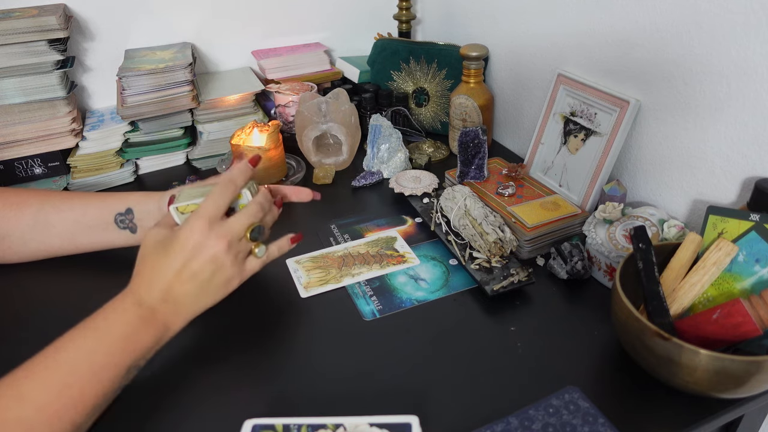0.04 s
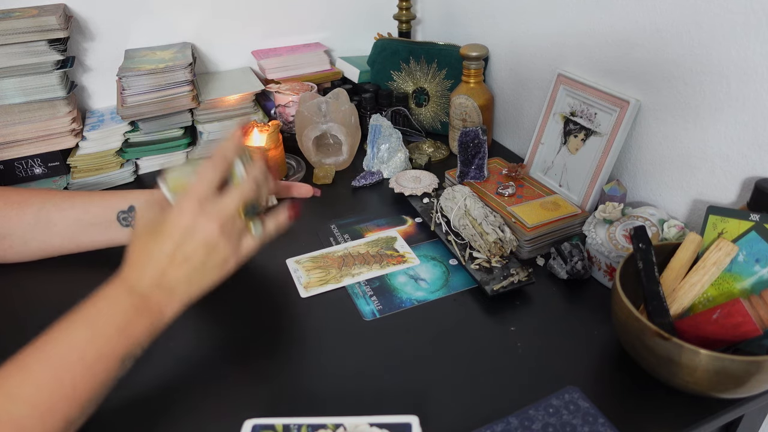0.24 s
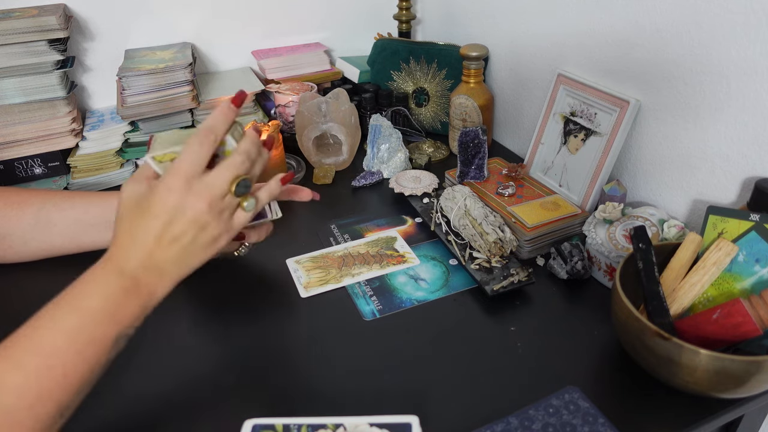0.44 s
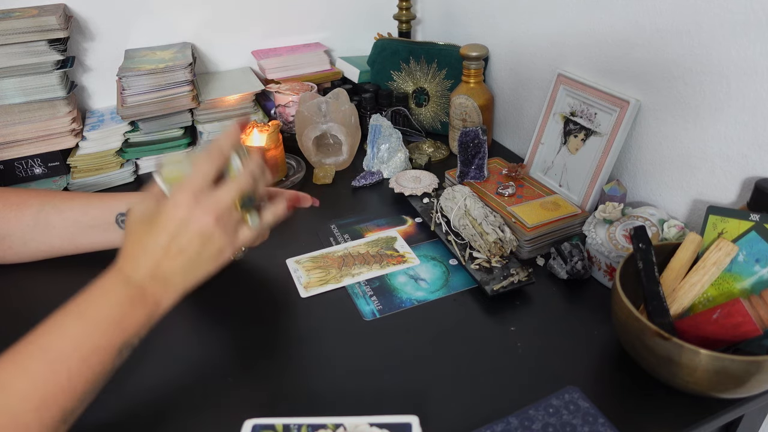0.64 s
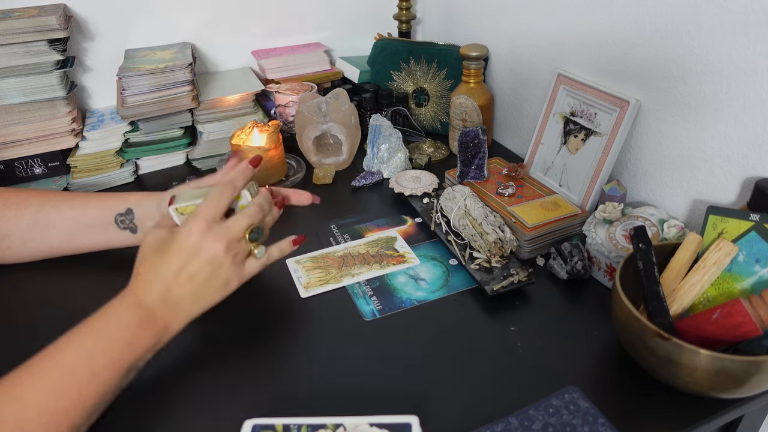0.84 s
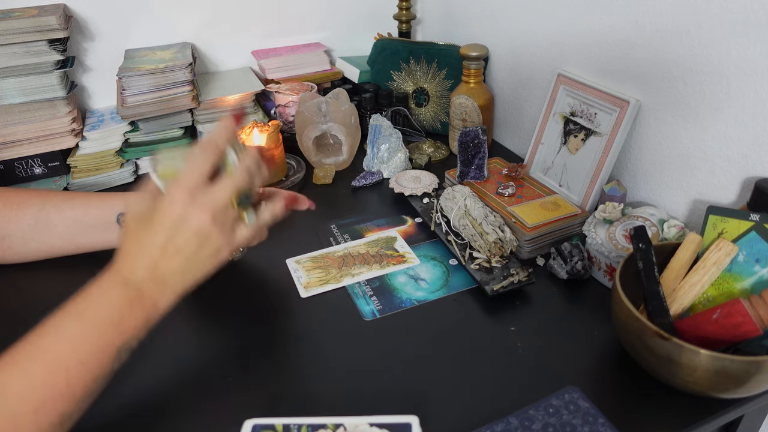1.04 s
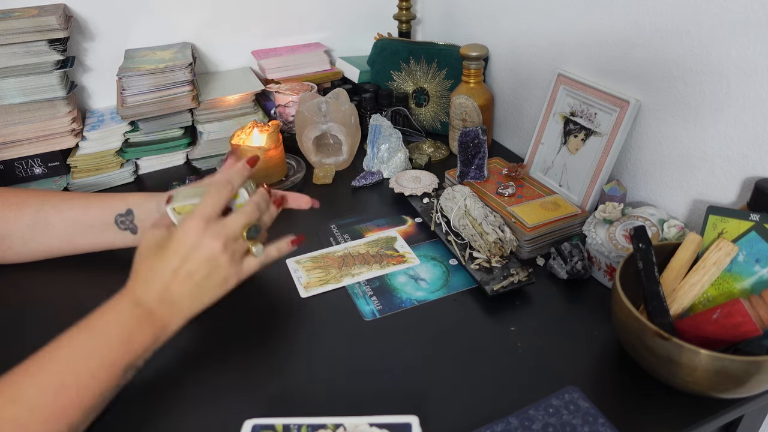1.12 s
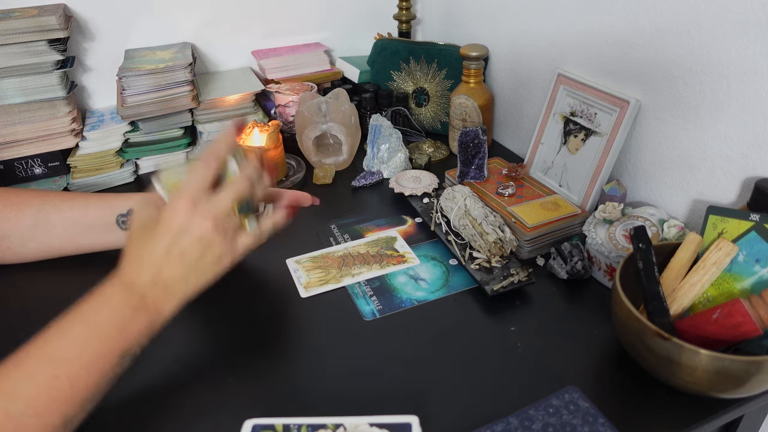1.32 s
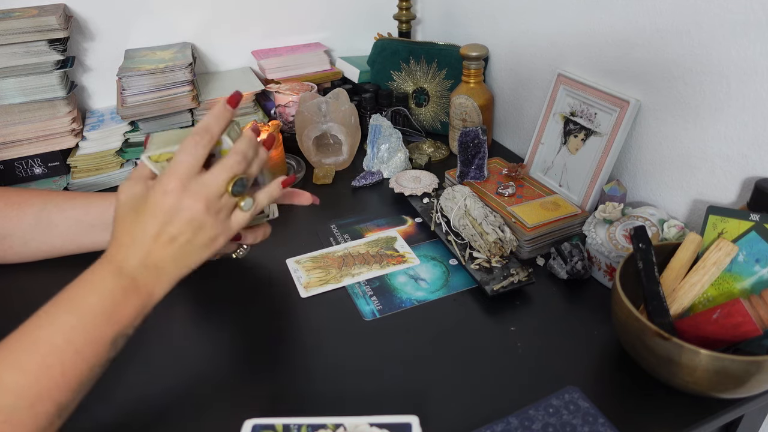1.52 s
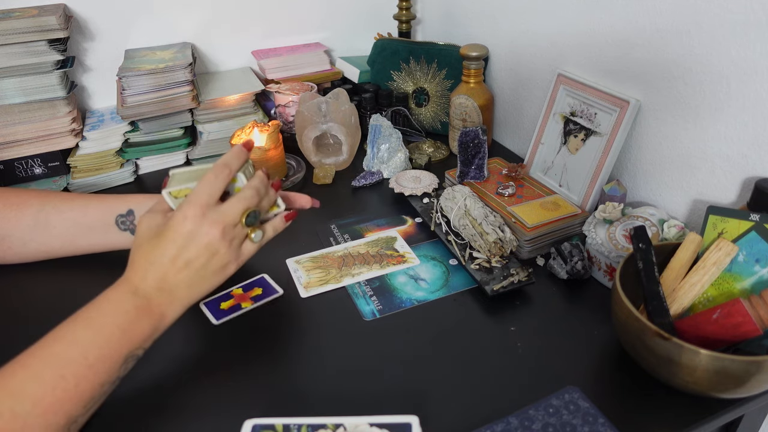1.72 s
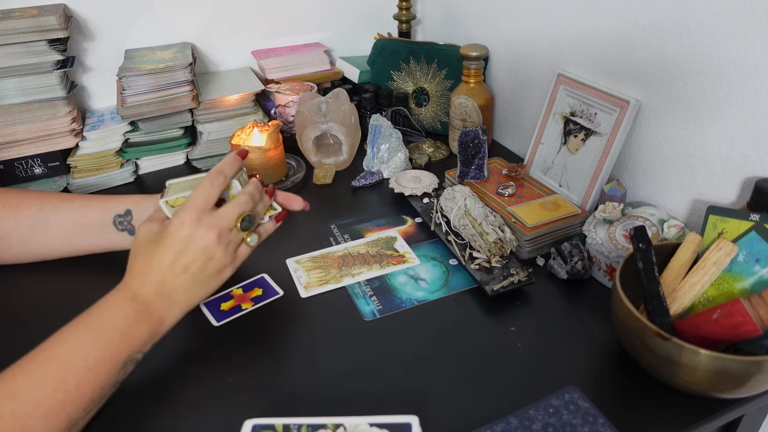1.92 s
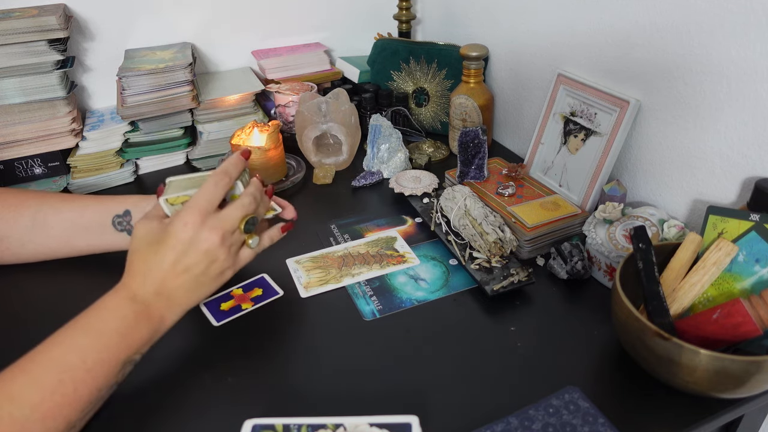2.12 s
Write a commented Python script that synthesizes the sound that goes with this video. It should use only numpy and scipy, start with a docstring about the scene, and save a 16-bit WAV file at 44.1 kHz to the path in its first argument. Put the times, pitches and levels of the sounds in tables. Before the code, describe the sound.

A deck of large cards is shuffled overhand in a small room: five brisk flick, slide and slap strokes, a rapid clatter of loose cards, then faint skidding and finger rubbing, picked up close.

```python
"""Overhand card shuffle

A deck of large cards is shuffled by hand above a table in a small room. In each stroke card edges flick,
a packet slides, then slaps onto the deck. The last packet clatters down, a card drops out and skids, and
fingers regrip the deck. Contacts are short noise bursts in five registers, rung through resonances;
slides are grainy filtered noise. Echoes, a diffuse tail and faint room tone surround them."""
import sys
import numpy as np
from scipy import signal
from scipy.fft import rfft, irfft
from scipy.io import wavfile

SR = 44100
rng = np.random.default_rng(int(sys.argv[2]) if len(sys.argv) > 2 else 0)


def transcribe(u):
    """Save the signal u as a 16-bit wav file named by the first command-line argument.

    u: samples, shape (n,) or (channels, n), limited to [-1, 1]; the rate is SR.
    q: integer samples, one column per channel.
    """
    v = np.clip(np.atleast_2d(u).T, -1, 1)
    q = np.round(v * 32767).astype(np.int16)
    wavfile.write(sys.argv[1], SR, q)


N = 95300  # length of the scene in samples
DIRECTIONS = 4  # paths of the sound: the first includes the direct one


def undb(db):
    """Decibels to gain."""
    return 10 ** (np.asarray(db) / 20)


def unit(x):
    """Scale to rms 1."""
    return x / np.sqrt(np.mean(x ** 2) + 1e-20)


def freqs(size):
    """Frequencies in Hz of the bins of a spectrum, kept above zero for the logarithm."""
    return np.maximum(np.fft.rfftfreq(size, 1 / SR), 1)


def curve(points, hz):
    """Read (Hz, value) points on a log frequency axis."""
    p = np.array(points, float)
    return np.interp(np.log(hz), np.log(p[:, 0]), p[:, 1])


def colour(x, db):
    """Filter by a gain in dB for each bin."""
    return irfft(rfft(x) * undb(db), x.shape[-1])


def resonate(x, hz, q, db):
    """Lift one resonance out of a sound."""
    b, a = signal.iirpeak(hz, q, fs=SR)
    return x + (undb(db) - 1) * signal.lfilter(b, a, x)


def add(out, start, x):
    """Mix x in at a time in seconds."""
    i = max(int(start * SR), 0)
    part = out[..., i:i + x.shape[-1]]
    part += x[..., :part.shape[-1]]


# Borders in Hz of the five registers of a contact: thud, body, snap, edge, tick.
REGISTER_BORDERS = [170, 480, 1500, 5000, 9000, 15000]
# Duration of each register, as a share of the contact length.
REGISTER_LENGTHS = [2.2, 0.91, 2.04, 0.95, 1.1]
ATTACK_S, SETTLE_S, SETTLE_DB = 0.0001, 0.007, -13.5  # onset, then a quieter tail as the cards settle
LEVEL_WINDOW_S = 0.005  # each register carries the energy of its level held this long
# The grip changes with every contact, and with it these two resonances.
HOLLOW_DB, HOLLOW_Q, RING_DB, RING_Q = 5.5, 6, 9.5, 4.95
RING_SPREAD_OCT = 0.4  # a bent packet rings at other pitches toward the walls


def contacts(table, trim_db, thud_db=None):
    """Cards touch in a brief burst that rings packet and cupped hand, finely different per direction."""
    default_thud = [] if thud_db is None else [thud_db]
    rows = np.array([list(row) + default_thud for row in table])
    start, length_ms, hollow, ring, snap, body, edge, tick, thud = rows.T[:, :, None, None]
    t = np.arange(1024) / SR
    length = length_ms / 1000
    touches = rng.standard_normal((len(rows), len(REGISTER_LENGTHS), DIRECTIONS, len(t)))
    for k, share in enumerate(REGISTER_LENGTHS):
        press = np.exp(-(t / (length * share)) ** 3)
        settle = undb(SETTLE_DB) * np.exp(-t / SETTLE_S)
        touches[:, k] *= (press + settle) * (1 - np.exp(-t / ATTACK_S))

    rung = np.empty_like(touches)
    for i, (hollow_hz, ring_hz) in enumerate(zip(hollow.ravel(), ring.ravel())):
        cupped = resonate(touches[i], hollow_hz, HOLLOW_Q, HOLLOW_DB)
        for d in range(DIRECTIONS):
            shift_oct = RING_SPREAD_OCT * (d - DIRECTIONS / 2) if d else 0
            rung[i, :, d] = resonate(cupped[:, d], ring_hz * 2 ** shift_oct, RING_Q, RING_DB)

    sounds = 0
    for k, relative_db in enumerate([thud, body, 0, edge, tick]):
        order = 2 if k == 0 else 3
        sos = signal.butter(order, REGISTER_BORDERS[k:k + 2], "band", fs=SR, output="sos")
        x = signal.sosfilt(sos, rung[:, k])
        level = np.sqrt(LEVEL_WINDOW_S * SR / np.sum(x ** 2, axis=-1, keepdims=True))
        sounds = sounds + undb(trim_db + snap + relative_db) * x * level

    out = np.zeros((DIRECTIONS, N))
    for s, sound in zip(start.ravel(), sounds):
        add(out, s, sound)
    return out


# Packets landing, a touch and then the blow. Each row: start in seconds, length in ms, pitch of the
# hand's hollow in Hz, central ring of the packet in Hz, snap in dB before the trim, then in dB relative
# to the snap: body, edge, tick, palm thud.
PACKET_SLAPS = [(.2503, 1.3, 1210, 3730, -35, -2.5, -4, -27, -13),
                (.2544, 1.18, 1260, 3550, -25, -5.5, -10.5, -16, -23),
                (.5144, 2.6, 540, 5200, -46.5, 2.5, 9, -11.5, -13),
                (.5227, 2.4, 1300, 3290, -31, -3, -13, -14, -25.5),
                (.7905, 1.9, 810, 4140, -38, -8.5, 1, -18.5, -12.5),
                (.7948, 2.35, 780, 7400, -36, -11, 4.5, -1.5, -14.5),
                (1.0673, 3.5, 765, 4400, -35.5, -7.5, -1.5, -17, -21),
                (1.0715, 1.02, 602, 7760, -32, -2.5, 4, 0.5, -14.5),
                (1.3467, 4.8, 1255, 3340, -36, -5, -14.5, -8.5, -16),
                (1.3723, 0.79, 905, 4840, -41.5, -6, -9.5, -16.5, -28)]


def slaps():
    """Each packet lands on the deck as a short burst with its own hollow and ring."""
    return contacts(PACKET_SLAPS, trim_db=-0.72)


# Cards of the loose last packet, hitting one after another. Each row: start in seconds, length in ms,
# hollow in Hz, central ring in Hz, snap in dB before the trim, then in dB relative to the snap: body,
# edge, tick, palm thud.
LOOSE_CARDS = [(1.453, 3.4, 1370, 2230, -39.5, -5.5, -11, -11, -27),
               (1.4612, 2, 1410, 1700, -39.5, -0.5, -8, -21.5, -8),
               (1.4654, 1.9, 1170, 4760, -35.5, -0.5, -4, -10.5, -15.5),
               (1.4677, 2.7, 1106, 3150, -27, -11, -3, -15.5, -14),
               (1.4716, 2.6, 1220, 5570, -29, -1.5, -4.5, -12, -14.5),
               (1.4804, 3.2, 1360, 1810, -31, -1, -6.5, -22, -22),
               (1.4895, 3, 1250, 1705, -33, 0, -4, -14, -22),
               (1.498, 4.5, 1400, 1970, -34.5, -7.5, -11.5, -24.5, -23.5)]


def clatter():
    """The loose last packet breaks into a quick run of separate hits."""
    return contacts(LOOSE_CARDS, trim_db=-0.46)


# Light flicks and taps of card edges. Each row: start in seconds, length in ms, hollow in Hz, central
# ring in Hz, snap in dB before the trim, then in dB relative to the snap: body, edge, tick.
EDGE_FLICKS = [(.1298, 2.5, 1220, 5400, -54, -7, -4, -13), (.1347, 1.6, 1270, 5100, -45.5, -7, -2.5, -18),
               (.1505, 0.78, 1110, 5400, -36, -9, 2.5, -30), (.1543, 3.7, 1230, 5320, -46.5, -5, -6, -27),
               (.3773, 2.3, 1280, 5300, -60, -14, 0, -14), (.4014, 3.3, 835, 5470, -49.5, -1, -1.5, -4),
               (.411, 2.6, 1150, 4860, -46.5, -13, -8, -18), (.4163, 2.2, 1070, 5300, -48.5, -1.5, -5, -25),
               (.4295, 1.6, 1140, 5260, -40, -8, 0, -23), (.6803, 2.1, 1195, 7400, -51.5, -11, 8, -2),
               (.691, 4.5, 1140, 6940, -54, 3, 7, -12), (.7345, 3.2, 1150, 7640, -65, -2, 10, 2.5),
               (.7472, 0.89, 1240, 8100, -69.5, -8, 13.5, 10), (.9536, 2.8, 1320, 6500, -46.5, -7, -4, -4),
               (.9614, 1.1, 1240, 5500, -42, -8.5, 3.5, -14),
               (.9694, 2.9, 1290, 2540, -47.5, -15, -8, -15.5),
               (1.0284, 2.7, 730, 6750, -51.5, 4.5, 2.5, -7.5),
               (1.2185, 1.8, 1040, 5110, -53.5, -10.5, -1, -8.5),
               (1.2244, 3.6, 1150, 7550, -52, 3.5, -2.5, -1), (1.232, 6.2, 1170, 2830, -48, -1, -7.5, -12),
               (1.276, 2.5, 1144, 5490, -62, -7, 0, -5), (1.3182, 10, 1344, 1707, -49.5, 2, -10.5, -10.5),
               (1.3931, 2, 1270, 4200, -52, -1.5, -6, -10), (1.435, 3, 1310, 7960, -54.5, -1, -3.5, -5),
               (1.6327, 1.7, 1240, 3090, -49, 4.5, -2.5, -23),
               (1.7088, 2.3, 720, 4300, -62.5, -3.5, 1.5, -6),
               (1.91, 2.4, 1080, 1940, -61.5, -0.5, -23, -17),
               (2.0333, 2.3, 1400, 1930, -66.5, -3, -19, -22),
               (2.039, 1.3, 710, 4500, -66.5, -6.5, -2, -8.5),
               (2.0597, 0.5, 663, 4600, -62.5, 4.5, -1.5, -13),
               (2.0744, 0.61, 720, 8300, -65.5, -7, -1, -10), (2.092, 1.1, 720, 8200, -69.5, -8, 2, -6)]


def flicks():
    """Card edges flick and tap lightly, all with the same small share of thud."""
    return contacts(EDGE_FLICKS, trim_db=-1, thud_db=-18.5)


SLIDE_RISE_DB, SLIDE_FALL_DB = 17.5, 23  # how far below its peak a stroke starts and ends
STROKE_EDGE_S = 0.0091  # ramp from and to silence


def swell(start, peak, end):
    """A stroke speeds up to its peak, then slows and stops; an end before the peak cuts it short."""
    t = np.arange(N) / SR
    db = np.interp(t, [start, peak, end], [-SLIDE_RISE_DB, 0, -SLIDE_FALL_DB])
    ramps = np.clip(np.minimum(t - start, end - t) / STROKE_EDGE_S, 0, 1)
    return undb(db) * ramps


GRAINS_PER_S, GRAIN_SHARE = 3900, 0.39  # mean rate of the catches, and their share of the power


def friction():
    """Smooth hiss with tiny random catches of the paper."""
    catches = rng.standard_normal(N) * (rng.random(N) < GRAINS_PER_S / SR)
    hiss = rng.standard_normal(N)
    return np.sqrt(GRAIN_SHARE) * unit(catches) + np.sqrt(1 - GRAIN_SHARE) * hiss


# Card faces sliding over each other. Each row: start in seconds, fastest point in seconds, end in
# seconds, level in dB, centre of the hiss in Hz, lift of the hiss over the rub in dB.
FACE_SLIDES = [(-.03, .003, 0.11, -44.5, 4300, 13), (0.118, 0.142, 0.33, -55, 5050, 7),
               (0.21, 0.255, 0.25, -42, 4600, 9), (.405, 0.418, 0.412, -48, 4800, 14),
               (0.472, 0.524, 0.54, -43, 6000, 16), (0.677, 0.677, .725, -49.5, 8500, 13),
               (0.747, 0.792, 0.84, -42, 7900, 18.5), (0.945, 0.96, .982, -52.5, 5800, 8.5),
               (1.014, 1.062, 1.07, -46.5, 7000, 9.5), (1.251, 1.313, 1.32, -54, 4000, 12),
               (1.303, 1.343, 1.349, -44, 9000, 14.5), (1.516, 1.55, 1.616, -47.5, 3800, 6.5)]
# Colour of rubbing card. Each row: frequency in Hz, gain in dB.
CARD_COLOUR = [(60, -26.5), (130, 0), (300, -1), (600, 4.5), (1200, 0.5), (2000, -6.5), (3300, -5),
               (6000, -6.5), (8600, -7), (11500, -15), (16000, -16)]
SLIDE_WIDTH_OCT = 0.92  # spread of the hiss around its centre


def slides():
    """Packets hiss across the deck: card-coloured friction with a broad bump in the treble."""
    f, out = freqs(N), np.zeros(N)
    for start, peak, end, db, hz, hiss_db in FACE_SLIDES:
        hiss = hiss_db * np.exp(-0.5 * (np.log2(f / hz) / SLIDE_WIDTH_OCT) ** 2)
        rub = unit(colour(friction(), curve(CARD_COLOUR, f) + hiss))
        out += undb(db) * swell(start, peak, end) * rub
    return out


# The fallen card skidding and fingers on the deck. Each row: start in seconds, strongest point in
# seconds, end in seconds, level in dB.
DULL_RUBS = [(1.637, 1.735, 2.125, -68), (2.05, 2.108, 2.44, -62.5)]
# Colour of the dull rubbing. Each row: frequency in Hz, gain in dB.
DULL_COLOUR = [(40, -17), (100, -5), (260, 4), (370, -8), (470, 1), (800, 0), (1350, -12), (2000, -12.5),
               (2700, -18.5), (5000, -28), (16000, -52)]


def rubs():
    """Slow rubbing is friction with little treble."""
    f, out = freqs(N), np.zeros(N)
    for start, peak, end, db in DULL_RUBS:
        rub = unit(colour(friction(), curve(DULL_COLOUR, f)))
        out += undb(db) * swell(start, peak, end) * rub
    return out


# Resonances of the deck in the cupped hand. Each row: frequency in Hz, width in Hz, lift in dB.
DECK_RESONANCES = [(520, 160, 0), (840, 180, 2), (910, 37, -8.5), (1220, 180, 0.5), (1900, 330, 1.5),
                   (2330, 730, 1.5), (3085, 160, 3), (4300, 500, 1), (7400, 1800, -0.5), (8900, 2200, -4.5),
                   (11000, 1000, 3.5)]


def deck(x):
    """The stack of cards colours every contact, slide and rub through resonances in series."""
    for hz, width, db in DECK_RESONANCES:
        x = resonate(x, hz, hz / width, db)
    return x


# Soft pushes of the palm as a packet comes down. Each row: start in seconds, length in seconds,
# level in dB.
PALM_PUSHES = [(.213, 0.016, -56), (.402, 0.0092, -65), (.503, 0.011, -60.5), (.788, .008, -59),
               (2.058, 0.009, -61)]
# Dark colour of the palm. Each row: frequency in Hz, gain in dB.
PALM_TONE = [(30, -24), (70, -13), (130, -2), (230, -3), (400, -2), (900, -28.5), (4000, -61.5)]


def palm():
    """Each push is low noise that swells to half its length and dies away."""
    out, t = np.zeros(N), np.arange(4096) / SR
    for start, length, db in PALM_PUSHES:
        push = t / length * 2 * np.exp(1 - 2 * t / length)
        x = push * colour(rng.standard_normal(len(t)), curve(PALM_TONE, freqs(len(t))))
        level = np.sqrt(length * SR / np.sum(x ** 2))
        add(out, start, undb(db) * x * level)
    return out


# A fingertip scraping the deck. Each row: start in seconds, strongest point in seconds, end in
# seconds, level in dB.
FINGER_SCRAPES = [(1.904, 1.922, 1.923, -55), (2.068, 2.116, 2.42, -64)]
# Colour of the scrape, which rings around one pitch. Each row: frequency in Hz, gain in dB.
SCRAPE_COLOUR = [(300, -29), (1100, -14), (1650, -14), (1900, 2), (2350, -12.5), (2900, -17), (5000, -17),
                 (8000, -29.5), (16000, -41)]


def scrapes():
    """A dry fingertip scrape is friction gathered around one pitch."""
    scrape = unit(colour(friction(), curve(SCRAPE_COLOUR, freqs(N))))
    strokes = sum(undb(db) * swell(start, peak, end) for start, peak, end, db in FINGER_SCRAPES)
    return scrape * strokes


# Echoes from table and near walls. Each row: delay in seconds, level in dB.
NEAR_ECHOES = [(.0024, -16.5), (.0082, -11.5), (0.0108, -18.5), (.028, -22)]
# Diffuse tail in bands. Each row: centre in Hz, level in dB, time to fall by 60 dB in seconds.
ROOM_TAIL = [(118, -6.5, 0.98), (257, -6, .55), (540, -14.5, 0.55), (1000, -12.5, 0.36), (1850, -12, 0.32),
             (3150, -11.5, 0.36), (5250, -15, 0.32), (8000, -13.5, 0.35), (13000, -16, 0.23)]
# Low room modes. Each row: frequency in Hz, time to fall by 60 dB in seconds, level in dB.
LOW_MODES = [(130.5, 1, -59.5), (254.6, .55, -62)]
ROOM_BUILD_S = 0.018  # time in which the tail builds up


def room(x):
    """One direction arrives straight; echoes share all directions, tail and low modes use the others."""
    t = np.arange(SR // 2) / SR  # the response stops after half a second
    f = freqs(len(t))
    noise = rfft(rng.standard_normal((DIRECTIONS - 1, len(t))))
    response = np.zeros((DIRECTIONS, len(t)))
    centres = np.log([row[0] for row in ROOM_TAIL])
    for weights, (hz, db, t60) in zip(np.eye(len(ROOM_TAIL)), ROOM_TAIL):
        build = 1 - np.exp(-(t / ROOM_BUILD_S) ** 2)
        fade = np.exp(-np.log(1000) * t / t60) * build
        # neighbouring bands crossfade on a log frequency axis
        band = irfft(noise * np.interp(np.log(f), centres, weights), len(t))
        response[1:] += undb(db) * band * fade / np.sqrt((DIRECTIONS - 1) * np.sum(fade ** 2))
    for hz, t60, db in LOW_MODES:
        response[1] += undb(db) * np.sin(2 * np.pi * hz * t) * np.exp(-np.log(1000) * t / t60)
    response[0, 0] = 1  # direct sound
    for k, (delay, db) in enumerate(NEAR_ECHOES):
        add(response[k % DIRECTIONS], delay, undb([db]))
    return signal.fftconvolve(x, response, axes=-1).sum(axis=0)[:N]


# Colour of the room tone. Each row: frequency in Hz, gain in dB.
TONE_COLOUR = [(20, -6), (50, -2.5), (110, -3), (250, -3.5), (700, -12.5), (1500, -15.5), (5000, -17.5),
               (16000, -34)]
TONE_DB = -76.5  # rms level


def room_tone():
    """Faint steady noise, strongest in the lows."""
    return undb(TONE_DB) * unit(colour(rng.standard_normal(N), curve(TONE_COLOUR, freqs(N))))


def scene():
    """The cards and hands in the room, over faint room tone."""
    cards = slaps() + clatter() + flicks() + slides() + rubs()
    hands = palm() + scrapes()
    return (room(deck(cards) + hands) + room_tone())[None]


# High treble lost at the microphone. Each row: frequency in Hz, gain in dB.
MICROPHONE_TREBLE = [(10000, 0), (12000, -1), (13500, -4), (16000, -6.5)]
TOP_HZ = 15850  # upper limit of the recorder


def record(dry):
    """The microphone softens the high treble and the recorder cuts the top."""
    soft = colour(dry, curve(MICROPHONE_TREBLE, freqs(N)))
    lowpass = signal.ellip(10, 0.2, 70, TOP_HZ, fs=SR, output="sos")  # 0.2 dB ripple, 70 dB stopband
    return signal.sosfilt(lowpass, soft)


dry = scene()
out = record(dry)
transcribe(out)
```